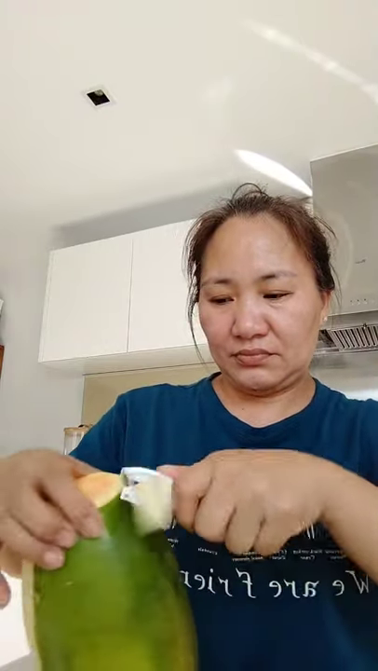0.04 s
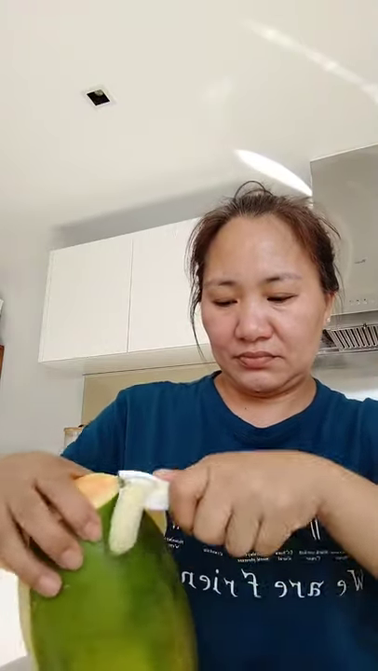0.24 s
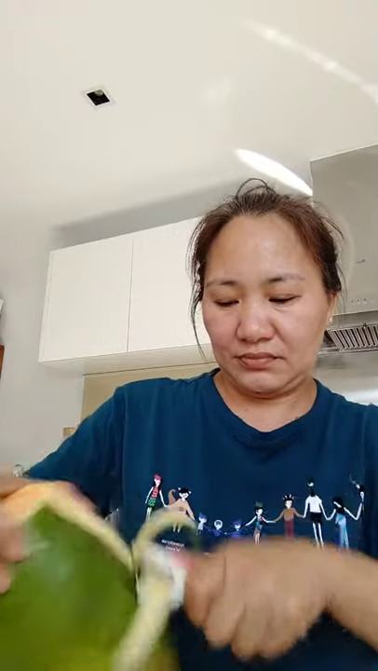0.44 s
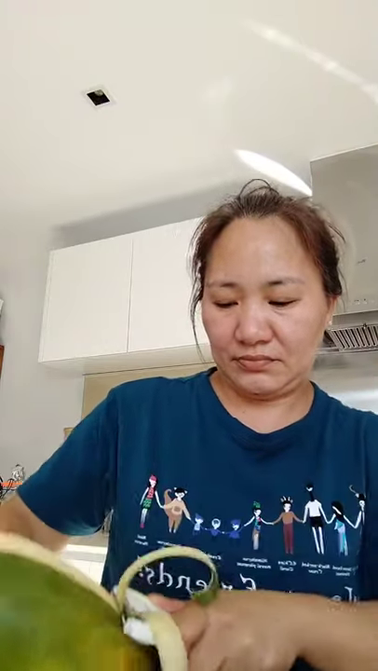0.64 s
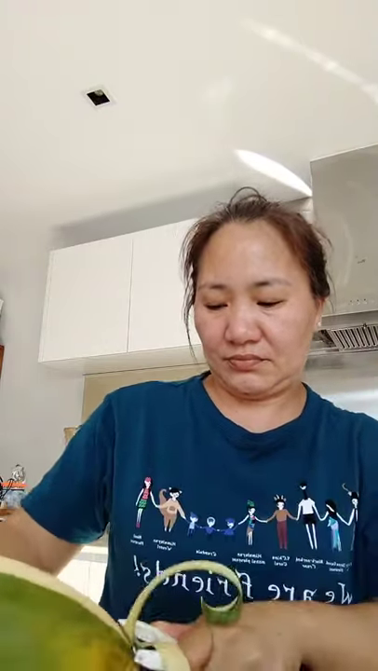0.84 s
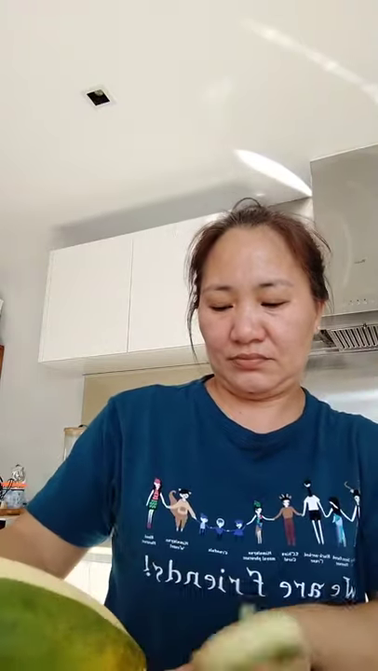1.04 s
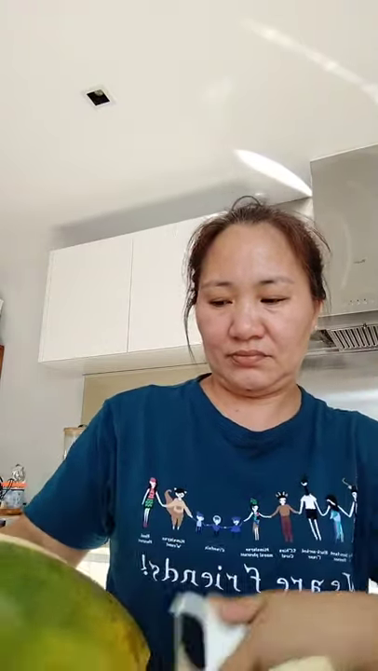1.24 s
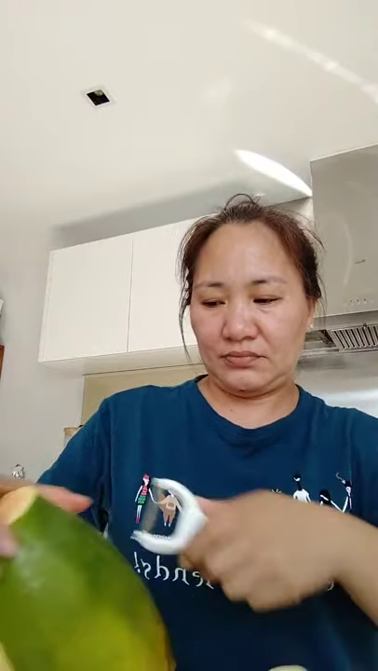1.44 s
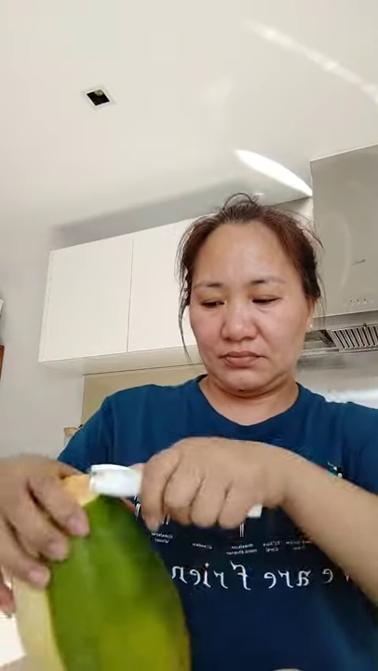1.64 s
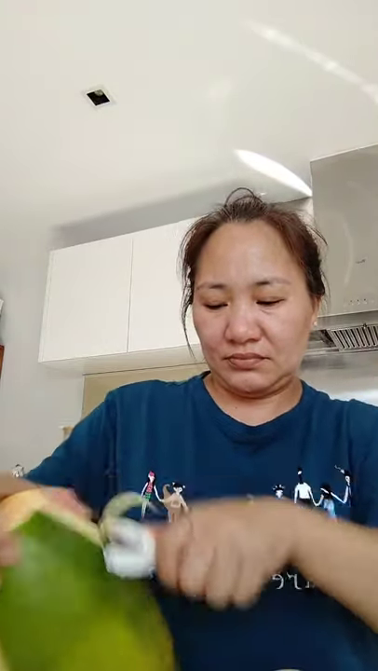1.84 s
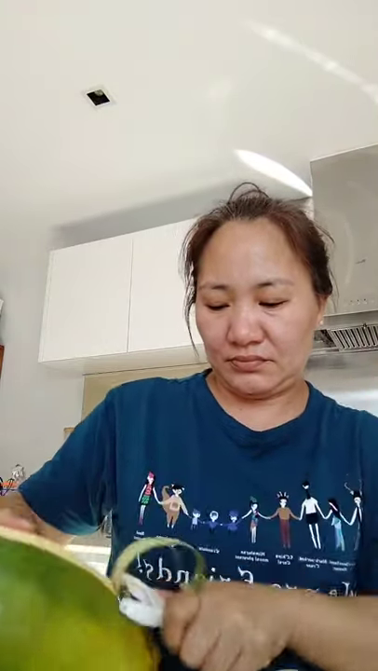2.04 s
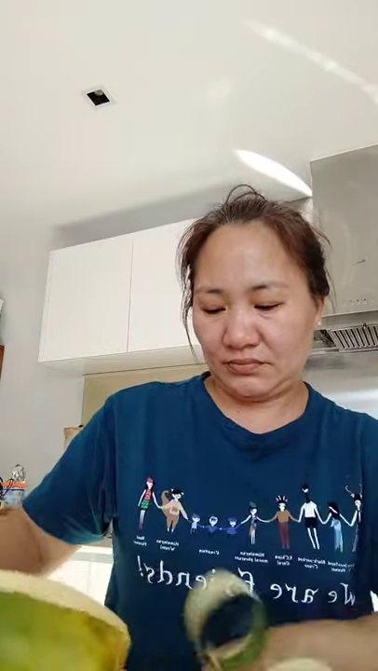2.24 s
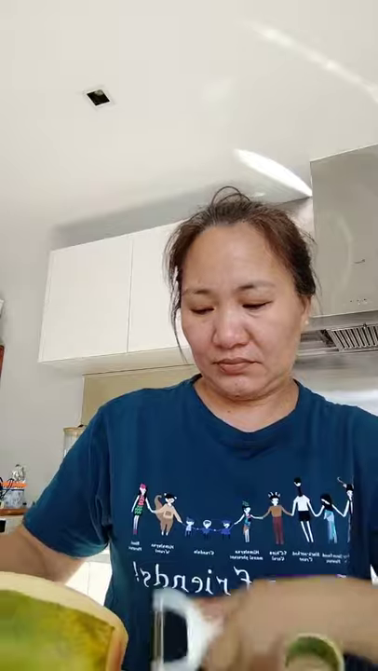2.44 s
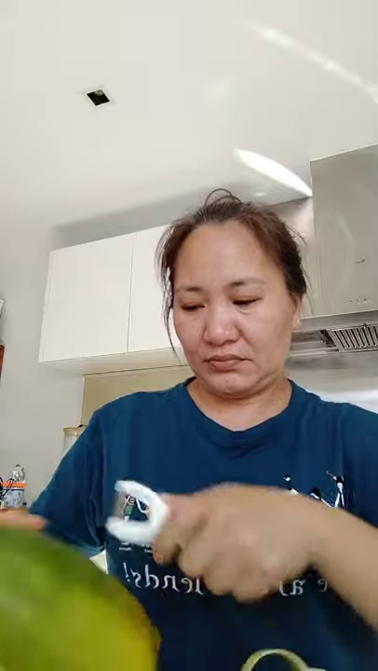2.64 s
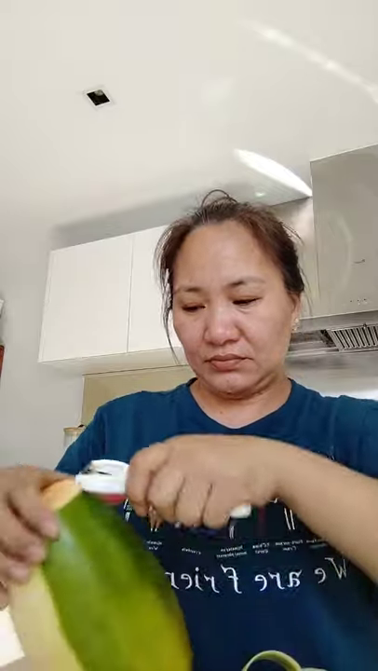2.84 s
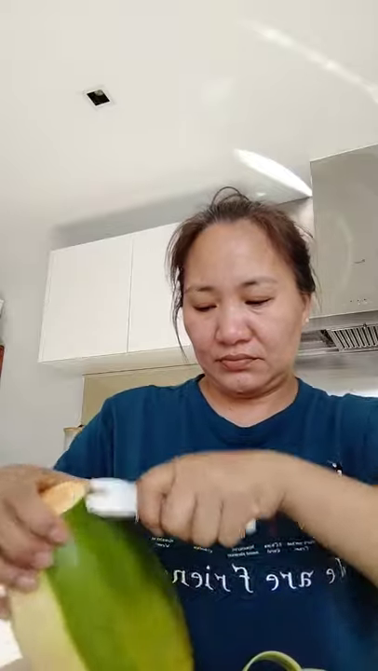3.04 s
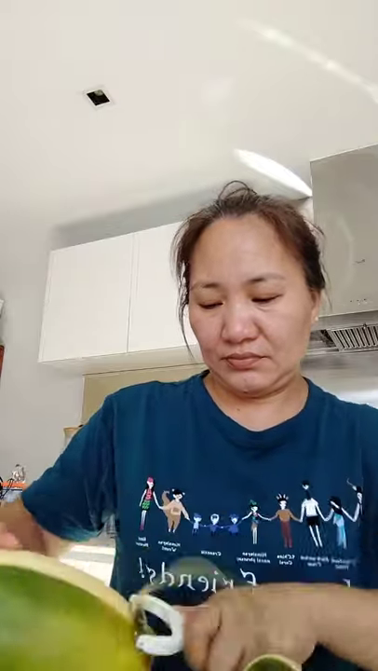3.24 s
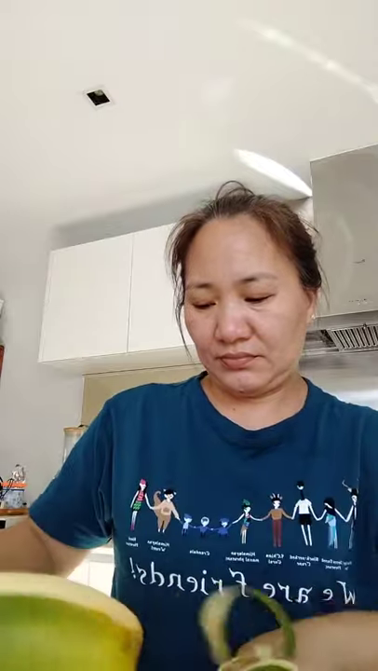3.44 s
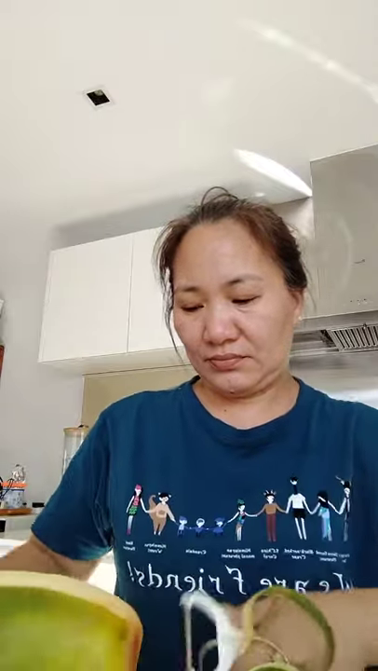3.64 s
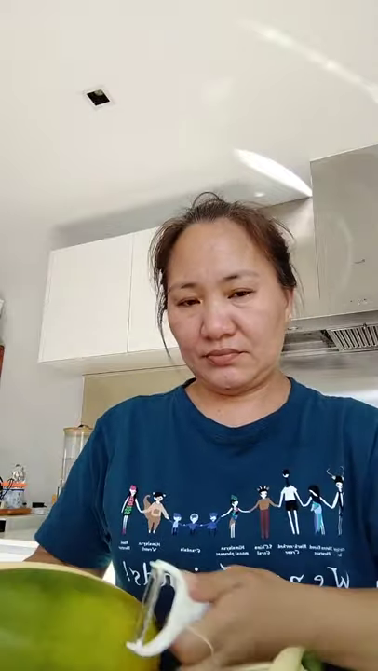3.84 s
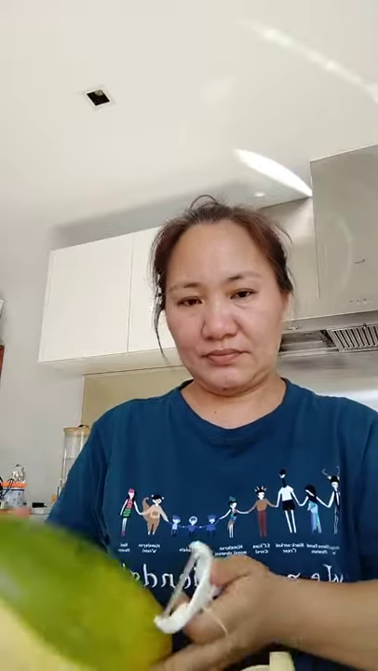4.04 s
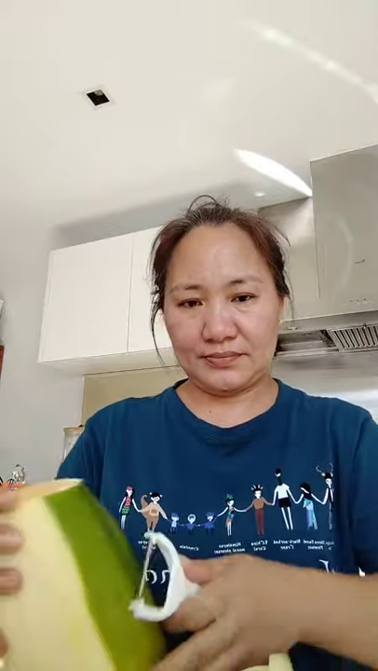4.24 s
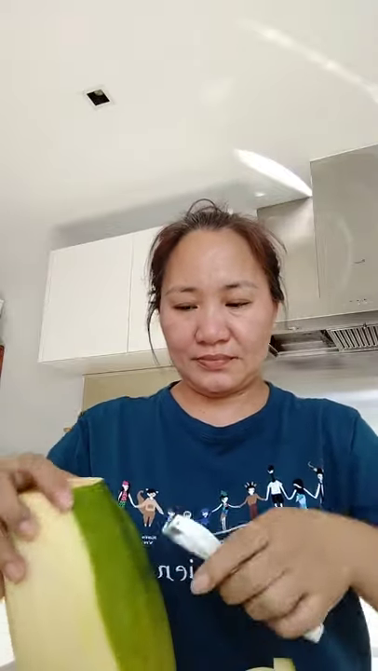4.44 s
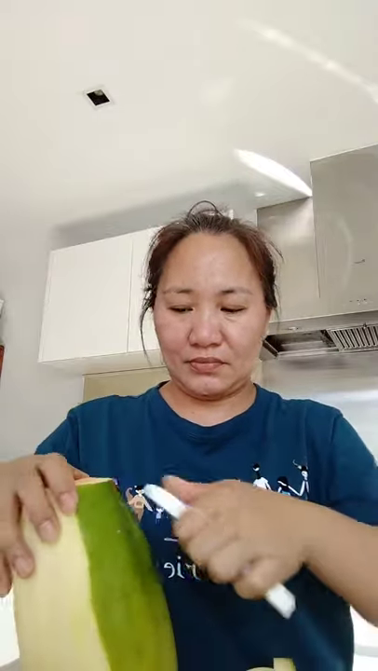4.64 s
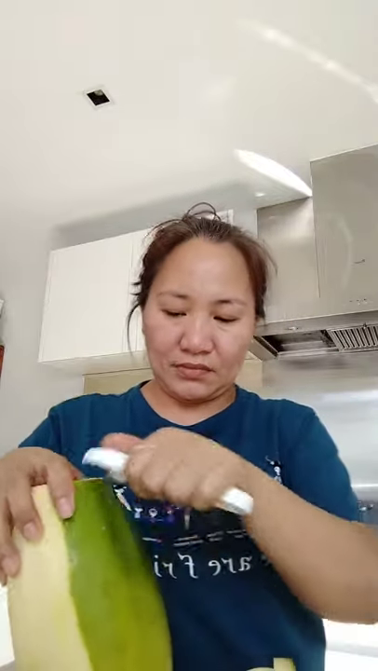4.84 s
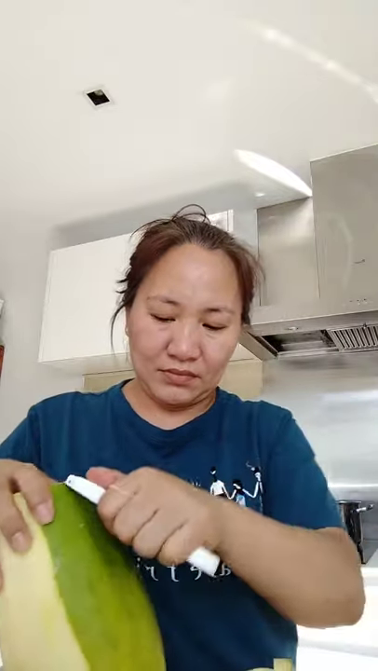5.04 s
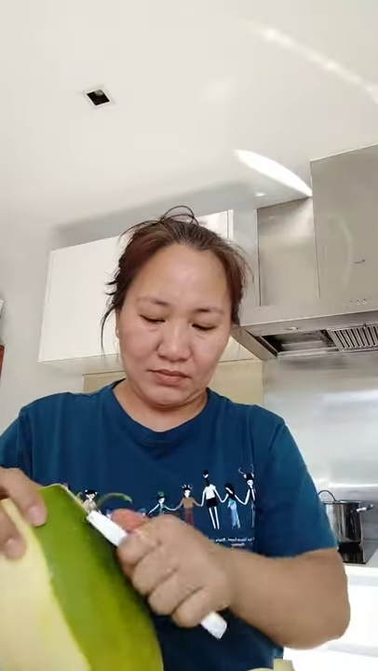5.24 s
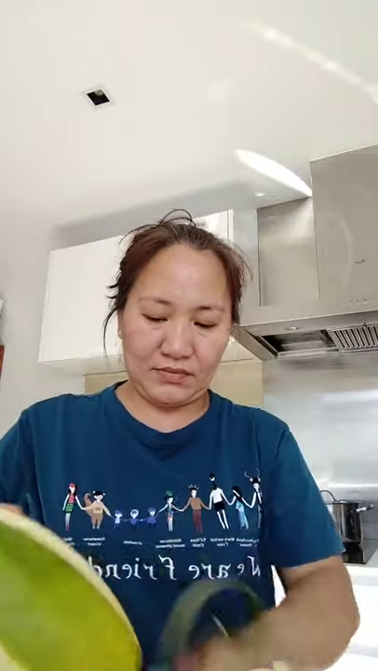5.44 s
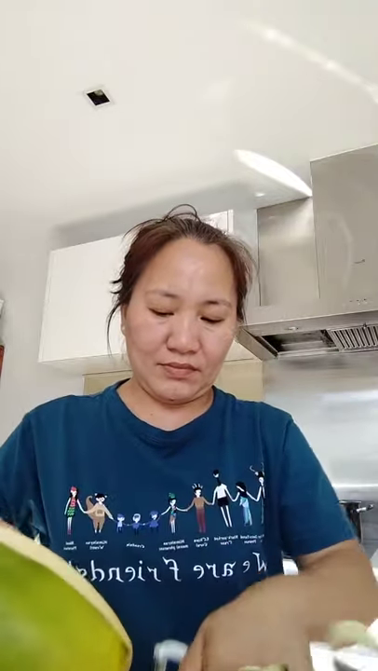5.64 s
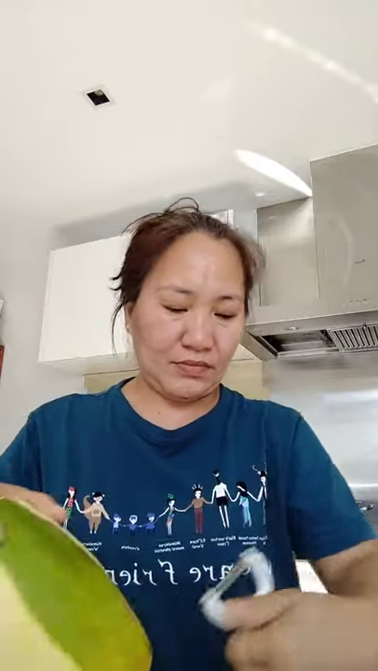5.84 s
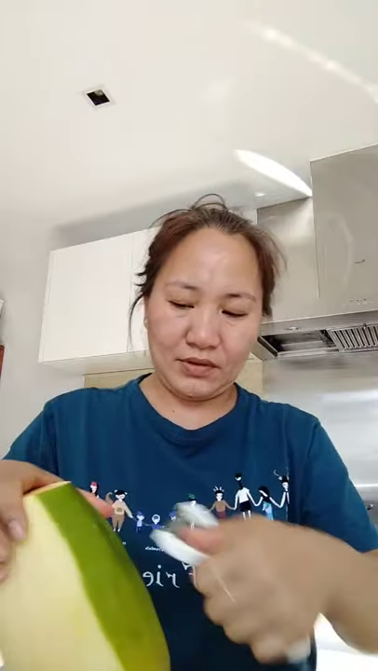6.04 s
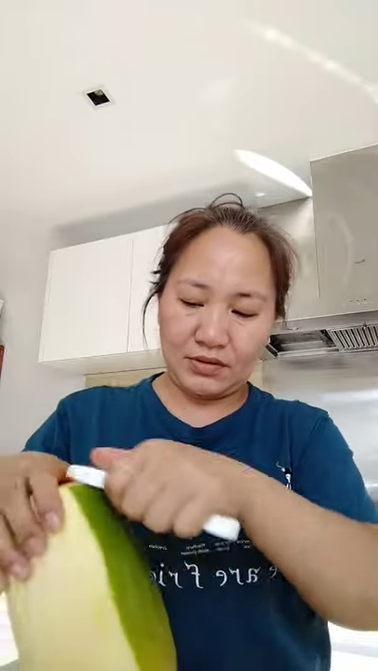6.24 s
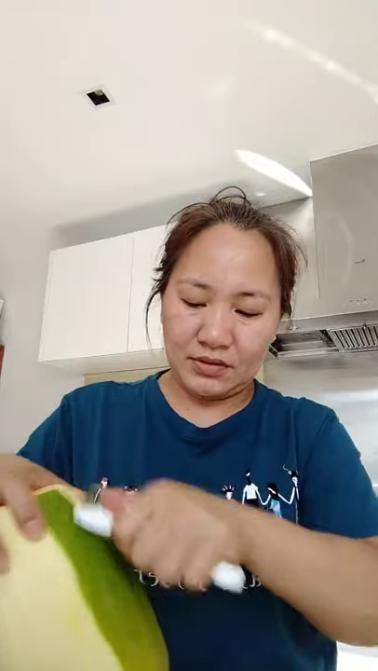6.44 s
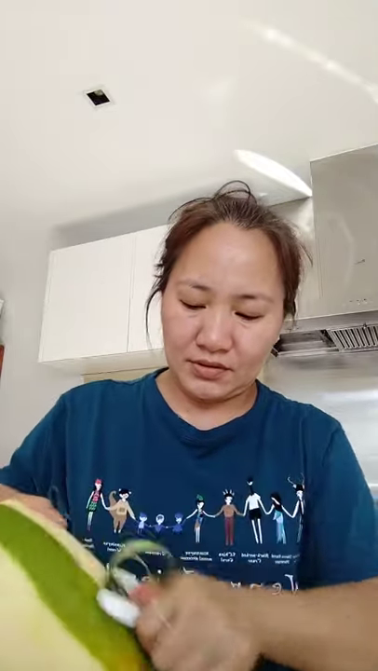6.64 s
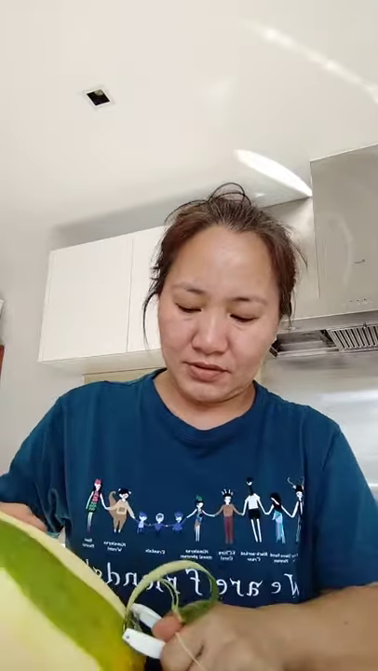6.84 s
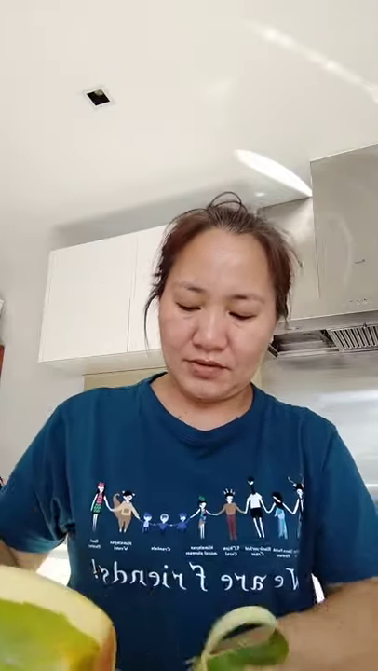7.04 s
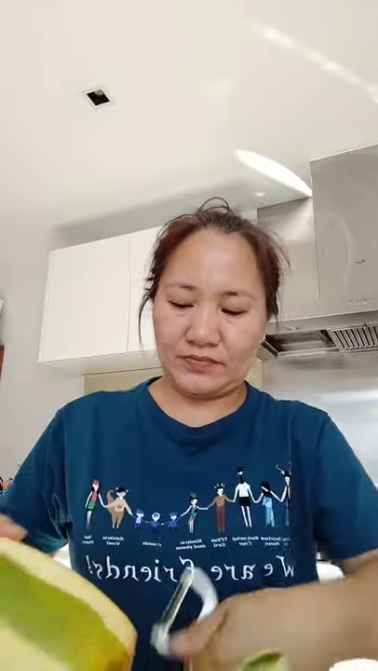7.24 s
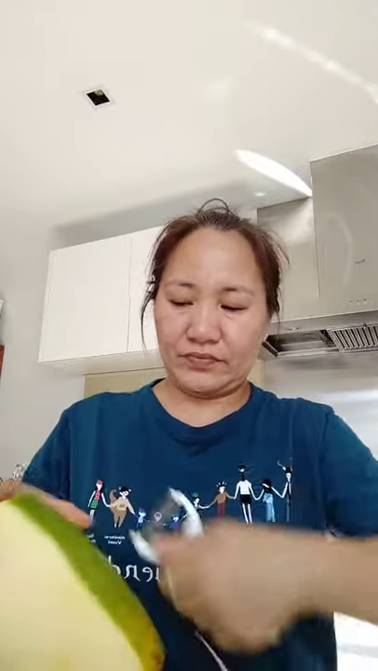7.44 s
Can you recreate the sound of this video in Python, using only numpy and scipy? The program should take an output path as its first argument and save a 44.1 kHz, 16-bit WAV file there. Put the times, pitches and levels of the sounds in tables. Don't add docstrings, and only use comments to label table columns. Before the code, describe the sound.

In a home kitchen, close to a phone, a peeler ticks onto a firm papaya and tears off skin in long, bright, uneven hisses with hollow fruit resonance. Strips end with plastic clacks and low worktop thuds. Between pulls come tiny blade rattles and light handling. A faint fan hum flickers behind, and noise suppression cuts the room's short echo.

```python
import sys
import numpy as np
from scipy import signal
from scipy.fft import rfft, irfft, next_fast_len
from scipy.io import wavfile
from scipy.ndimage import uniform_filter1d

SR = 44100
rng = np.random.default_rng(int(sys.argv[2]) if len(sys.argv) > 2 else 0)


def inscribe(sig):
    pcm = np.round(np.clip(np.atleast_2d(sig).T, -1, 1) * 32767)
    wavfile.write(sys.argv[1], SR, pcm.astype(np.int16))


def invert_db(x):
    u = np.asarray(x, float) / 20
    return 10 ** u


N = 331191

# frequency in Hz, level in dB per Hz.
FAN_AIR = [(15, -58.5), (25, -12.5), (92, -21), (187, -12), (286, -1), (456, -41.5), (618, -27),
           (1010, -35.5), (1420, -30), (2010, -41), (3200, -44.5), (4160, -74), (7040, -120)]
# frequency in Hz, level in dB per Hz.
HIGH_AIR = [(3000, -47.5), (5500, -55), (7000, -51), (8200, -50.5), (11000, -53), (14500, -60)]
# time in seconds, hum level in dB.
HUM_LEVEL = [(0.0, -66.5), (1.0, -60.5), (1.29, -65.5), (1.55, -58.5), (1.9, -72), (2.4, -55), (3.05, -73),
             (3.64, -56.5), (3.83, -76), (4.06, -70), (4.35, -74.5), (4.48, -55.5), (4.83, -71.5),
             (5.31, -64), (5.58, -58.5), (6.63, -64), (7.19, -58), (7.51, -65)]
# start in seconds, level in dB, pitch in Hz.
FLICKERS = [(0.06, -73, 1134), (0.377, -75, 935), (0.793, -48.5, 1316), (1.365, -68.5, 1460),
            (1.523, -65, 1440), (1.639, -71.5, 1200), (1.54, -75, 1150), (1.771, -54, 1674),
            (1.772, -62, 932), (2.682, -73, 1420), (3.842, -62, 1390), (3.89, -66, 1390),
            (4.021, -72.5, 930), (4.104, -75, 940), (4.225, -66, 1480), (4.594, -67, 1127),
            (4.62, -66.5, 753), (5.01, -54.5, 1214), (5.221, -65, 900), (5.281, -54.5, 870),
            (5.89, -62, 1410), (6.11, -65.5, 897), (6.15, -56.5, 1386), (6.18, -64, 745), (6.25, -58, 1194),
            (6.457, -60, 1420), (7.426, -70, 950)]
# frequency in Hz, time to fall by 60 dB in seconds.
KITCHEN_DECAY = [(100, 0.61), (500, 0.49), (2000, 0.47), (7000, 0.45), (14000, 0.5)]
# frequency in Hz, level in dB.
LEARNT_NOISE = [(100, -88.5), (400, -77), (1000, -78.5), (2000, -80), (3200, -100), (7000, -100),
                (15000, -105)]
# frequency in Hz, side minus middle in dB.
SIDE_COLOUR = [(4000, -63), (5000, -17.5), (7000, -50), (9000, -10.5), (13000, -11), (15000, -23.5)]
# frequency in Hz, level in dB.
PORT_COLOUR = [(700, -42), (1500, -20), (3000, -7.5), (4000, -5), (5300, -4), (6900, 0), (8500, -6),
               (11000, -18.5), (15000, -15)]

# start in seconds, peak level in dB.
SETTLING = [
    (0.818, -71),
    (1.249, -77),
    (1.718, -77.5),
    (3.779, -77),
    (4.551, -73.5),
    (5.779, -63),
    (6.878, -64),
    (7.349, -77.5),
]
# frequency in Hz, level in dB, time to fall by 60 dB in seconds.
WORKTOP_THUD = [(94, 6, 0.13), (147, 12, 0.048), (167, -2, 0.096)]
# frequency in Hz, width in Hz, level in dB.
WORKTOP_PANEL = [(301.7, 86, 2), (371, 86, 3.5), (484, 59, -4.5), (610, 91, -8), (802, 150, -5.5)]
# frequency in Hz, width in Hz, level in dB.
HANDLE = [(1230, 180, -5.5), (1450, 110, 5.5), (1916, 180, 2.5)]
# frequency in Hz, width in Hz, level in dB.
YOKE = [(2165, 180, 4), (2720, 190, 4.5), (3360, 110, 3.5)]
# start in seconds, clack level in dB,
# snap minus clack in dB, upper clack minus clack in dB, pitch ratio.
CLACKS = [(1.0887, -41, 8, -5, 0.89), (1.0941, -42.5, 11.5, 2, 0.91), (1.101, -33, -23, -11, 1.06),
          (2.34, -28.5, 7.5, -1, 0.96), (3.5432, -29.5, 7, -9, 1.06), (3.549, -22.5, -14.5, -1, 0.89),
          (4.3365, -24, -1, 4, 0.99), (4.342, -20.5, -16, -10, 1.04), (5.5926, -26.5, -23.5, -21, 1),
          (5.5953, -19.5, -9, 4, 0.93), (7.0755, -22.5, -11, -8.5, 0.65), (7.0776, -12, -2.5, 4, 0.99),
          (7.091, -31, -13, -8.5, 1.3)]
# start in seconds, thud level in dB, panel level in dB,
# thud pitch ratio, panel pitch ratio.
THUMPS = [(1.095, -41.5, -25.5, 0.83, 0.97), (1.103, -39.5, -38, 1.13, 0.77),
          (2.3344, -48, -23.5, 1.7, 1.01), (2.343, -42, -36, 1.2, 1.06), (2.349, -33, -32.5, 1.03, 1.18),
          (3.5412, -46, -18.5, 1.5, 0.96), (3.5504, -23.5, -35, 1.03, 1.16),
          (3.556, -33.5, -30.5, 0.82, 1.05), (4.326, -38.5, -34, 0.55, 1.07), (4.338, -30, -18, 1.4, 1.24),
          (4.343, -31.5, -34, 0.89, 1.02), (4.352, -30, -29, 0.9, 1.15), (4.771, -79, -48.5, 0.9, 0.95),
          (5.590, -44, -17.5, 0.64, 0.94), (5.6012, -28.5, -25, 0.92, 0.97), (6.16, -76, -54, 0.94, 0.89),
          (7.0684, -39, -32.5, 1.18, 1.16), (7.0764, -29.5, -22, 1.1, 1.19),
          (7.094, -44.5, -27.5, 0.73, 0.82)]
# start in seconds, level
# in dB, frequency in Hz, width in Hz, time to fall by 60 dB in seconds.
SHUDDERS = [(1.099, -41.5, 329, 350, 0.24), (2.346, -52, 400, 450, 0.27), (3.55, -44, 800, 500, 0.26),
            (4.325, -60, 950, 500, .1), (5.601, -42.5, 328, 260, 0.52), (5.599, -42, 1250, 300, 0.33),
            (7.082, -41.5, 1880, 1500, 0.22), (7.089, -48, 348, 395, .35), (3.04, -68.5, 1200, 1000, 0.22),
            (5.011, -63.5, 1000, 900, 0.22), (6.408, -68, 920, 700, 0.19)]

# start in seconds, level in dB, frequency in Hz,
# width in Hz, time to fall by 60 dB in seconds.
WISPS = [(1.49, -81.5, 7300, 1500, 0.58), (1.489, -86, 13700, 2970, 0.37), (2.73, -86, 9760, 1500, 0.59),
         (2.73, -78.5, 13600, 3000, 0.63), (2.74, -89, 7450, 1190, 0.67), (3.825, -73.5, 7300, 1186, 1),
         (3.885, -78, 9500, 1400, .6), (3.886, -82, 12500, 1300, 0.55), (3.886, -86, 15200, 900, .9),
         (4.02, -82, 9600, 1600, .05), (4.043, -80, 9500, 1600, .05), (4.067, -90, 9500, 1300, 0.21),
         (4.067, -91, 6800, 300, .6), (4.067, -80, 15220, 1205, 0.56), (4.124, -83.5, 7470, 1016, 0.38),
         (4.218, -89, 10000, 400, .04), (3.828, -75, 4560, 1600, 0.71), (4.34, -37, 722, 452, 0.22),
         (4.75, -78, 1810, 297, 0.76), (4.951, -81.5, 1420, 302, 0.93), (6.5, -62, 870, 200, 0.7),
         (6.52, -65, 407, 198, 1), (0.45, -68.5, 730, 150.6, 0.13), (4.236, -75, 7700, 1300, 0.43),
         (4.272, -77.5, 6900, 500, 0.22), (4.269, -65, 2990, 500, 0.15), (4.6, -76, 7000, 1800, 0.54),
         (5.785, -73.5, 7600, 1800, 0.21), (5.785, -87, 9600, 700, 0.45), (5.912, -75.5, 7300, 1400, 0.34),
         (5.91, -78, 5120, 900, 0.39), (5.94, -88.5, 13400, 1200, 0.6), (6.05, -76.5, 2950, 890, 1),
         (6.12, -91, 14300, 900, 0.84), (6.291, -70.5, 8270, 1500, 0.38), (6.3, -88, 5030, 500, .3),
         (6.299, -76.5, 3320, 500, 0.61)]
# time in seconds, rub level in dB.
RUSTLE = [
    (5.74, -58),
    (5.818, -56),
    (5.888, -63),
    (5.915, -62.5),
    (6.034, -62.5),
    (6.178, -63.5),
    (6.22, -64),
    (6.338, -62),
    (6.36, -53),
]

# time in seconds, peak level in dB, ring pitch in Hz,
# ring minus peak in dB, low ring minus peak in dB.
LANDINGS = [(0.1805, -55, 6830, -4.5, -16), (0.184, -22.5, 3520, -17, -39),
            (0.1842, -61, 1870, 13.5, -11.5), (0.1843, -46, 6670, 1, -6), (0.184, -46.5, 14500, 2, -8.5),
            (0.396, -48, 6940, -2.5, -32), (1.7775, -27, 6570, -17, -16), (1.7825, -26, 6740, -19, -17),
            (1.8003, -27, 5140, -15, -26), (1.812, -34, 6970, -12, -12), (3.0372, -41, 4130, -7, -16),
            (3.045, -28, 6800, -20, -16.5), (3.0568, -30, 7200, -15, -15), (3.0859, -31, 6800, -17, -17.5),
            (3.0859, -45, 12530, 2, -5.5), (5.0085, -34.5, 8800, -14, -2), (5.0142, -26, 4980, -13, -6.5),
            (5.014, -36.5, 9920, -1, -4.5), (5.0143, -45.5, 14600, 2, -2), (5.023, -52, 7360, 11, -17),
            (5.033, -65, 3010, 5.5, 2), (5.042, -54, 3100, 10, -12), (5.239, -43, 6170, -6, 3),
            (6.3375, -38.5, 7840, -7, -6), (6.4058, -37, 8630, -3, 4.5), (6.4153, -28.5, 7900, -11, -6)]
# time in seconds, peak level in dB, ring pitch in Hz,
# ring minus peak in dB, low ring minus peak in dB.
FLICKS = [(2.7362, -75, 7200, -7, -16), (2.7564, -74.5, 2930, 10, 16), (2.801, -75, 7900, -13, -15),
          (3.9804, -57.5, 4150, 5.5, 4.5), (4.0672, -68, 4140, 14, -9), (4.124, -63.5, 4300, 3, -14),
          (4.282, -43, 6860, -11, -13.5), (4.288, -41, 6960, -9, -11), (4.5934, -44, 6400, -9.5, -18.5),
          (4.6095, -46, 6370, -13.5, -25), (4.7742, -44.5, 3160, 0.5, -18), (4.786, -41, 3070, -20, -19)]
# time in seconds, peak level in dB, ring pitch in Hz,
# ring minus peak in dB, low ring minus peak in dB.
TAPS = [(1.4985, -63.5, 7500, -6, -1.5), (3.5226, -47.5, 6740, 17.5, 10.5), (3.522, -51, 3520, 7, 4),
        (3.8014, -64.5, 4700, -2, 14.5), (3.825, -43.5, 7320, -17, -13), (3.8849, -42.5, 3850, -8, -9),
        (3.885, -66, 10000, 4, -9.5), (3.885, -54.5, 15100, -0.5, -4), (4.2203, -78, 3650, 14.5, -7),
        (4.2494, -44, 6740, -5.5, -15), (4.3275, -18, 6700, -5.5, -23), (4.329, -49.5, 12500, -5, -2.5),
        (4.329, -42.5, 14400, 0, -5.5), (4.474, -35, 7360, -9, -8), (5.587, -41, 3400, 1, 2),
        (5.6125, -34, 3900, -10, 1.5)]
# start in seconds, level in dB, pitch in Hz, length in seconds.
CHATTER = [(0.2094, -64, 4300, 0.12), (0.43, -51.5, 3240, 0.074), (0.5494, -41, 2550, 0.061),
           (0.9994, -60, 3250, 0.25), (1.028, -51.5, 3370, 0.033), (1.046, -48, 3400, 0.023),
           (1.062, -47, 3450, 0.022), (1.075, -46, 3500, 0.02), (1.091, -34, 3520, 0.011),
           (1.178, -50, 1450, .016), (1.05, -55, 6800, 0.081), (1.038, -55, 1390, 0.028),
           (1.813, -60, 2180, 0.12), (2.752, -69, 2390, 0.057), (3.107, -57, 2320, 0.54),
           (3.978, -58.5, 2104, 0.084), (4.07, -75, 4250, 0.08), (4.268, -61, 2200, 0.14),
           (4.59, -66, 2250, 0.087), (3.99, -75, 4200, 0.076), (4.763, -68, 3160, 0.059),
           (5.106, -47, 2450, 0.093), (5.2515, -58, 3260, 0.11), (5.792, -53.5, 1839, 0.093),
           (5.8915, -63, 1860, 0.073), (5.895, -62, 3360, 0.12), (6.152, -62, 2830, 0.089),
           (6.494, -51, 1824, 0.089), (6.982, -49, 2780, 0.17), (7.392, -71.5, 1700, 0.085)]

# frequency in Hz, width in Hz, level in dB.
FLESH = [(412, 31, 6), (683, 30, 0), (866, 20, 1)]
# frequency in Hz, width in Hz, level in dB.
FRAME = [(1450, 350, -2), (2000, 450, -1), (2500, 450, 0), (3250, 600, -2)]
# frequency in Hz, level in dB per Hz.
HISS_COLOUR = [(2060, -50.5), (3500, -15.5), (4170, -2.5), (4500, -1), (6830, -1.5), (7840, -5),
               (9040, -14.5), (9500, -21.5), (12400, -49), (20900, -120)]
# frequency in Hz, level in dB per Hz.
FIZZ_COLOUR = [(5000, -29.5), (8500, -5.5), (9070, -8.5), (10100, -6.5), (11100, -8), (12000, -5),
               (14900, 1), (15800, -13.5)]
# time in seconds, ring pitch in Hz.
BLADE_RING = [(0.45, 7120), (0.62, 6660), (0.85, 7020), (2.0, 7050), (2.2, 6710), (3.3, 7030), (4.9, 7290),
              (5.13, 8600), (5.3, 8400), (5.43, 8060), (5.52, 6980), (6.4, 8130), (6.62, 8280),
              (6.76, 6930), (7.1, 7030)]
# fastest moment in seconds, speeding up in seconds,
# slowing down in seconds, hiss level in dB, flesh minus hiss in dB.
PUSHES = [(0.47, 0.12, 0.23, -51, -19), (0.6, 0.23, 0.13, -39, -7.5), (0.826, 0.15, 0.16, -46.5, -2.5),
          (1.08, 0.14, 0.16, -52.5, -23), (1.8, 0.022, 0.059, -64, 1), (1.998, 0.22, 0.16, -41, -9),
          (2.2, 0.15, 0.38, -46.5, -2.5), (2.332, 0.13, 0.068, -50, 0.5), (3.066, 0.053, 0.1, -56.5, -22),
          (3.287, 0.22, 0.2, -38, -8), (3.536, 0.13, 0.076, -46.5, 6), (5.026, 0.042, 0.027, -57, -22),
          (5.136, 0.094, 0.072, -53.5, -10.5), (5.284, 0.11, 0.13, -48, -14.5),
          (5.45, 0.11, 0.22, -45.5, -21), (5.565, 0.22, 0.042, -47, 4.5), (6.413, 0.024, 0.013, -46, -11.5),
          (6.61, 0.28, 0.21, -45, -17.5), (6.782, 0.13, 0.21, -44.5, -8.5), (7.05, 0.12, 0.18, -47.5, 7)]
# start in seconds, lower frame minus hiss in dB, upper frame minus hiss in dB,
# fizz minus hiss in dB.
GRIPS = [
    (0.3, -15.5, -6, -1),
    (0.72, -13, 0.5, -3),
    (0.97, -12, -5.5, -4),
    (1.7, -10, -4.5, 0.5),
    (3, -9.5, -4, 1.5),
    (4.9, -19, 5.5, 1),
    (5.38, -6, 4, 2),
    (6.3, -3, -3.5, -1),
    (6.72, -0.5, -1.5, -2),
]


def unit(x):
    return x / np.sqrt(np.mean(x ** 2) + 1e-20)


def along(points, hz):
    f, v = np.transpose(points)
    return np.interp(np.log(hz + 1), np.log(f + 1), v)


def curves(rows, outside=None):
    s, *cols = np.transpose(rows)
    return [np.interp(np.arange(N) / SR, s, c, outside, outside) for c in cols]


def filtered(x, response):
    m = next_fast_len(N + SR // 2)
    return irfft(rfft(x, m) * response(np.fft.rfftfreq(m, 1 / SR)), m)[..., :N]


def band(f, lo_hz, hi_hz):
    return 1 / (1 + (lo_hz / (f + 1)) ** 6) / (1 + (f / hi_hz) ** 6)


def resonances(peaks):
    def response(f):
        total = 0
        for k, (centre, width, db) in enumerate(peaks):
            damping = 1j * f * width
            total = total + (-1) ** k * invert_db(db) * damping / (centre * centre - f * f + damping)
        return total
    return response


def patchy(x, depth_db, bins, frames, shape=lambda hz, s: 1):
    hz, s, z = signal.stft(x, SR, nperseg=512)
    field = uniform_filter1d(rng.standard_normal(z.shape), size=bins, axis=0)
    field = uniform_filter1d(field, size=frames, axis=1)
    z = z * invert_db(depth_db * unit(field)) * shape(hz[:, None], s)
    return signal.istft(z, SR, nperseg=512)[1][:N]


def burst(t, attack, t60):
    return rng.standard_normal(len(t)) * (1 - np.exp(-t / attack)) ** 2 * invert_db(-60 * t / t60)


def sounded(force, body):
    gain = body(np.fft.rfftfreq(len(force), 1 / SR))
    near = irfft(rfft(force) * gain, len(force))
    spread = irfft(gain, len(force))
    spread = np.roll(spread, 100) * np.linalg.norm(near) / np.linalg.norm(spread)
    fade = np.clip(np.linspace(4, 0, len(force)), 0, 1)
    return fade * np.array([near, spread]) / np.abs(near).max()


def swells(rows, spread):
    out, t = np.zeros(N + SR), np.arange(SR // 4) / SR
    for s, db, hz, length in rows:
        wander = unit(uniform_filter1d(rng.standard_normal(len(t)), size=150))
        cycles = np.cumsum(hz * (1 + spread * wander)) / SR
        swell = np.sin(np.pi * np.clip(t / length, 0, 1) ** 0.4) ** 2
        out[round(s * SR):][:len(t)] += invert_db(db) * swell * np.sin(2 * np.pi * cycles)
    return out[:N]


def narrow_noise(peaks):
    return unit(filtered(rng.standard_normal(N), lambda f: resonances(peaks)(f) ** 2))


def fan():
    hum = patchy(narrow_noise([(281, 46, 0)]), depth_db=2, bins=4, frames=6)
    whistle = patchy(narrow_noise([(7450, 35, 0), (7870, 40, -9)]), depth_db=4, bins=3, frames=30)
    low = patchy(rng.standard_normal(N), depth_db=5.5, bins=2, frames=12)
    streaks = patchy(rng.standard_normal(N), depth_db=5, bins=1, frames=50)
    air = filtered(low, lambda f: invert_db(along(FAN_AIR, f)) * (f < 3200))
    air += filtered(streaks, lambda f: invert_db(along(HIGH_AIR, f)) * (f >= 3200))
    open_db, = curves(HUM_LEVEL)
    whistle *= invert_db(-86.5 + 0.4 * (open_db - open_db.mean()))
    flickers = swells([(*row, 0.074) for row in FLICKERS], spread=0.034)
    return invert_db(open_db + 7.5) * hum + whistle + invert_db(-62.5) * unit(air) + flickers


def kitchen(x):
    out, step = np.zeros(N + 2 * SR), SR // 4
    for at in range(0, N, step):
        hz, t, z = signal.stft(rng.standard_normal(SR // 2 + SR // 4), SR, nperseg=256)
        decay = invert_db(-60 * t / along(KITCHEN_DECAY, hz)[:, None])
        tail = signal.istft(z * decay, SR, nperseg=256)[1]
        wet = signal.fftconvolve(x[at:at + step], tail / np.linalg.norm(tail))
        out[at + 150:][:len(wet)] += wet
    return out[:N]


def suppressed(x, least_db, memory):
    hz, _, z = signal.stft(x, SR, nperseg=1024, noverlap=768)
    power = uniform_filter1d(np.abs(z) ** 2, size=5, axis=0)
    power = signal.lfilter([1 - memory], [1, -memory], power, axis=1)
    power = np.abs(np.roll(power, -1, axis=1))
    noise = invert_db(2 * along(LEARNT_NOISE, hz))[:, None]
    gain = np.maximum(power / (power + noise), invert_db(least_db))
    return signal.istft(z * gain, nperseg=1024, noverlap=768)[1][:N]


def wisps(rows):
    out, t = np.zeros(N + SR), np.arange(SR // 4) / SR
    for s, db, hz, width, t60 in rows:
        def streaky_band(f):
            streaks = unit(uniform_filter1d(rng.standard_normal(len(f)), size=30))
            return invert_db(6.6 * streaks) / (1 + (2 * (f - hz) / width) ** 4)
        out[round(s * SR):][:len(t)] += invert_db(db + 12) * sounded(burst(t, 0.0016, t60), streaky_band)[0]
    return out[:N]


def rustle():
    rub_db, = curves(RUSTLE)
    slip = patchy(rng.standard_normal(N), depth_db=5.5, bins=2, frames=16)
    rub = unit(filtered(slip, lambda f: band(f, lo_hz=1020, hi_hz=3000) ** 3))
    upper = unit(filtered(slip, lambda f: band(f, lo_hz=3160, hi_hz=6630) ** 3))
    running, = curves([(RUSTLE[0][0], 1), (RUSTLE[-1][0], 1)], 0)
    running = uniform_filter1d(running, size=400)
    return running * invert_db(rub_db) * (rub + invert_db(-26.0) * upper)


def ring(modes, t, attack):
    strengths = rng.normal(0, 1.5, len(modes))
    notes = 0
    for (hz, db, t60), change_db in zip(modes, strengths):
        notes = notes + invert_db(db + change_db - 60 * t / t60) * np.sin(2 * np.pi * hz * t)
    return (1 - np.exp(-t / attack)) ** 2 * notes


def tuned(peaks, ratio):
    return resonances([(hz * ratio, width, db) for hz, width, db in peaks])


def knocks():
    out, t = np.zeros((2, N + SR)), np.arange(SR // 2) / SR
    for s, db, snap_db, click_db, ratio in CLACKS:
        blow = sounded(burst(t, 0.0005, 0.017), tuned(HANDLE, ratio))
        click_gain = invert_db(click_db + np.array([[0], [-5]]))
        blow += click_gain * sounded(burst(t, 0.00036, 0.0099), tuned(YOKE, ratio))
        blow += invert_db(snap_db) * sounded(burst(t, 0.00059, 0.037), lambda f: invert_db(along(PORT_COLOUR, f)))
        out[:, round(s * SR):][:, :len(t)] += invert_db(db) * blow
    for s, thud_db, panel_db, ratio, panel_ratio in THUMPS:
        force = 0.32 * burst(t, 0.0029, 0.12) - np.exp(-(t / 0.00046 - 2) ** 2)
        blow = invert_db(panel_db) * sounded(force, tuned(WORKTOP_PANEL, panel_ratio))
        thud = invert_db(thud_db) * ring(WORKTOP_THUD, t * ratio, 0.00062)
        out[:, round(s * SR):][:, :len(t)] += blow + thud
    for s, db in SETTLING:
        rock = ring([(67.0, -1.7, 1.0), (81.4, -0.32, 0.65)], t, 0.011)
        out[:, round(s * SR):][:, :len(t)] += invert_db(db + 11.0) * rock
    return out[:, :N]


def ticks():
    out, t = np.zeros(N + SR), np.arange(SR // 10) / SR
    lead = 0.006

    def touch(width):
        crush = np.exp(-((t - lead - 0.0015) / width) ** 2)
        trail = 0.16 * np.clip((t - lead) / 0.005, 0, 1) * invert_db(-60 * t / 0.14)
        return rng.standard_normal(len(t)) * (crush + trail)

    def rung(width, hz, width_hz):
        return sounded(touch(width), lambda f: resonances([(hz, width_hz, 0)])(f) ** 2)[0]

    for rows, low_hz in [(LANDINGS, 2195), (FLICKS, 2300), (TAPS, 1320)]:
        for s, db, hz, ring_db, low_db in rows:
            grip_db = 2.2 * unit(uniform_filter1d(rng.standard_normal(len(t) // 2 + 1), size=40))
            crunch = sounded(touch(0.0017), lambda f: invert_db(along(PORT_COLOUR, f) + grip_db))[0]
            crunch += invert_db(ring_db) * rung(0.0018, hz, 320)
            crunch += invert_db(low_db) * rung(0.0013, low_hz, 230)
            out[round((s - lead) * SR):][:len(t)] += invert_db(db - 1.0) * crunch
    return out[:N]


def push(t, rise, fall):
    return -52 * np.abs(t / np.where(t < 0, rise, fall)) ** 1.73


def effort():
    t, hiss, flesh = np.arange(N) / SR, np.zeros(N), np.zeros(N)
    bite_s, bite_grows = 0.029, 0.76
    for s, rise, fall, db, flesh_db in PUSHES:
        near = slice(round((s - 0.4) * SR), round((s + 0.4) * SR))
        hiss[near] += invert_db(db + push(t[near] - s, rise, fall))
        flesh[near] += invert_db(db + flesh_db + bite_grows * push(t[near] - s - bite_s, rise, fall))
    since, lower_db, upper_db, fizz_db = np.transpose(GRIPS)
    grip = np.maximum(np.searchsorted(since, t) - 1, 0)
    late = np.roll(hiss, round(0.014 * SR))
    return hiss, flesh, late * invert_db(lower_db[grip]), hiss * invert_db(upper_db[grip]), hiss * invert_db(fizz_db[grip])


def blade_shape(hz, s):
    width_hz, boost_db = 480, 4.5
    centre = np.interp(s, *np.transpose(BLADE_RING))
    return 1 + invert_db(boost_db) / (1 + ((hz - centre) / width_hz) ** 2)


def shaving():
    unevenness = unit(uniform_filter1d(rng.standard_normal(N), size=24))
    tearing = rng.standard_normal(N) * invert_db(2.2 * unevenness)
    edge = patchy(tearing, depth_db=3.1, bins=4, frames=16, shape=blade_shape)
    hiss = filtered(edge, lambda f: invert_db(along(HISS_COLOUR, f)))
    fizz = filtered(edge, lambda f: invert_db(along(FIZZ_COLOUR, f)))
    pulp = patchy(tearing, depth_db=3.9, bins=3, frames=14)
    flesh = filtered(pulp, lambda f: band(f, lo_hz=397, hi_hz=1370) * (0.17 + np.abs(resonances(FLESH)(f))))
    frame = filtered(pulp, lambda f: band(f, lo_hz=950, hi_hz=4140) ** 2 * (0.5 + np.abs(resonances(FRAME)(f))))
    lower = filtered(frame, lambda f: 1 / (1 + (f / 1695) ** 6))
    layers = [hiss, flesh, lower, frame - lower, fizz]
    return sum(gain * unit(layer) for gain, layer in zip(effort(), layers))


def scene():
    scrape = shaving() + rustle() + swells(CHATTER, spread=0.04)
    touches = ticks()
    blows, room_blows = knocks()
    echo = kitchen(invert_db(-11.0) * scrape + invert_db(-8.0) * touches + invert_db(-7) * room_blows)
    near = scrape + touches + blows + echo
    mid = suppressed(near, least_db=-37.0, memory=0.88) + fan() + wisps(WISPS + SHUDDERS)
    first_strip = np.arange(N) < 1.3 * SR
    last_knock = np.arange(N) > 7 * SR
    wide = patchy(mid * first_strip, depth_db=9.5, bins=20, frames=5)
    wide += invert_db(-2.0) * touches + invert_db(-11.0) * blows * last_knock
    side = filtered(np.roll(wide, 40), lambda f: invert_db(along(SIDE_COLOUR, f)))
    return np.array([mid + side, mid - side])


def band_limit(x):
    return signal.sosfilt(signal.butter(12, 16610, fs=SR, output="sos"), x)


def record(dry):
    def trim(f):
        bass_cut = (1j * f / (66 + 1j * f)) ** 3
        return bass_cut * invert_db(along([(15450, -2.5), (15750, -46.5), (16600, -56.0)], f))
    mix = filtered(dry, trim)
    return band_limit(mix)


dry = scene()
out = record(dry)
inscribe(out)
```